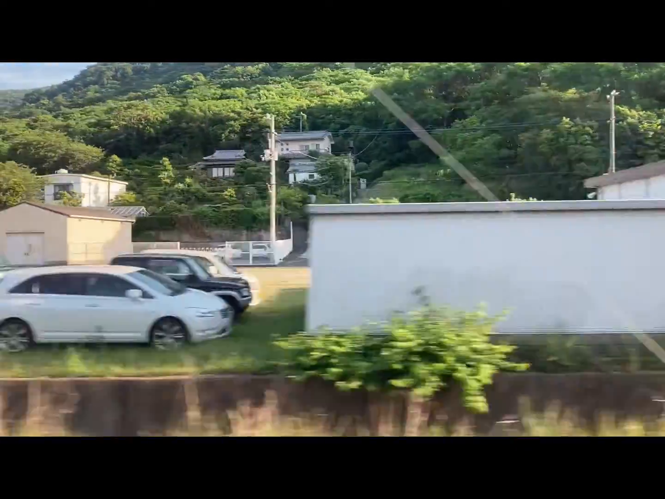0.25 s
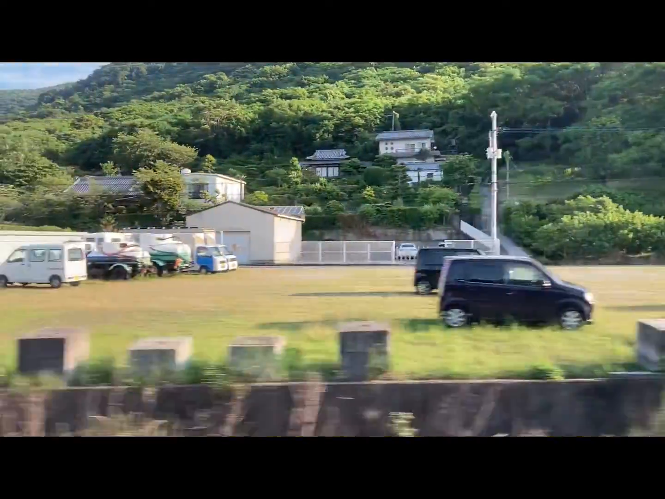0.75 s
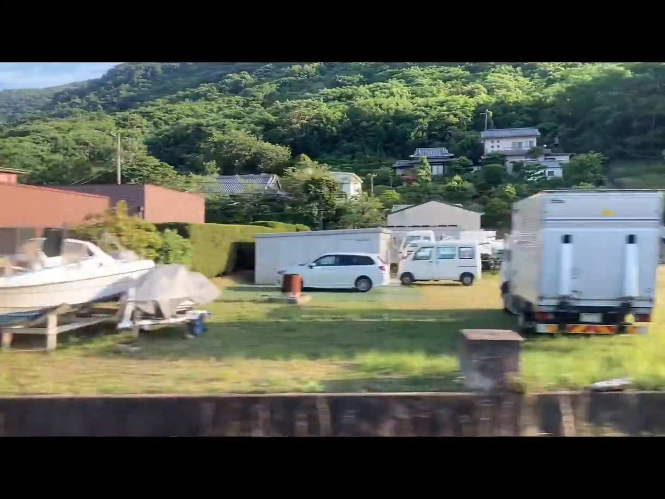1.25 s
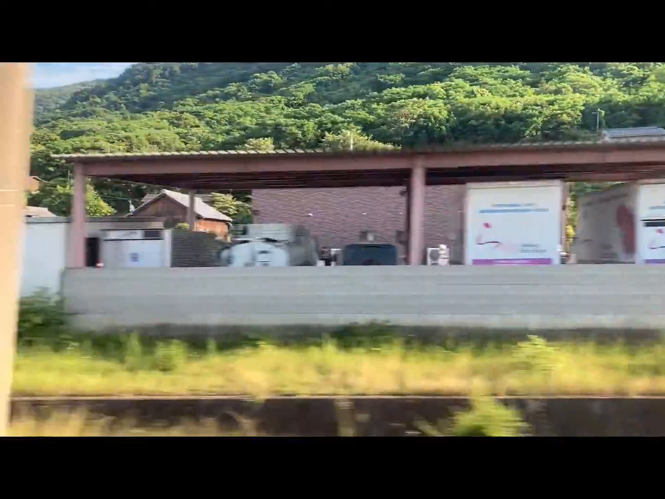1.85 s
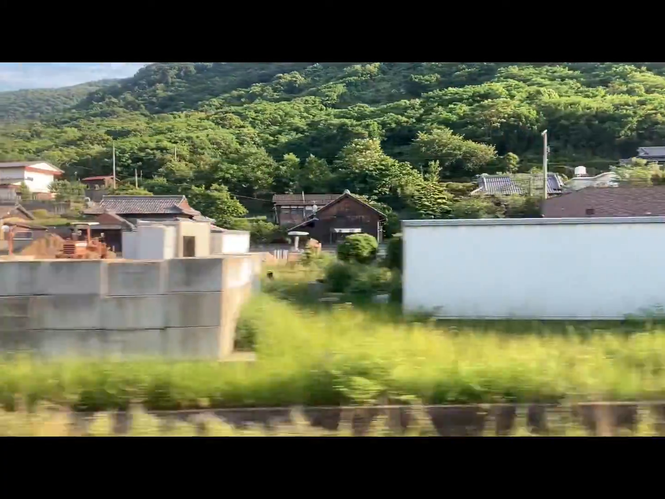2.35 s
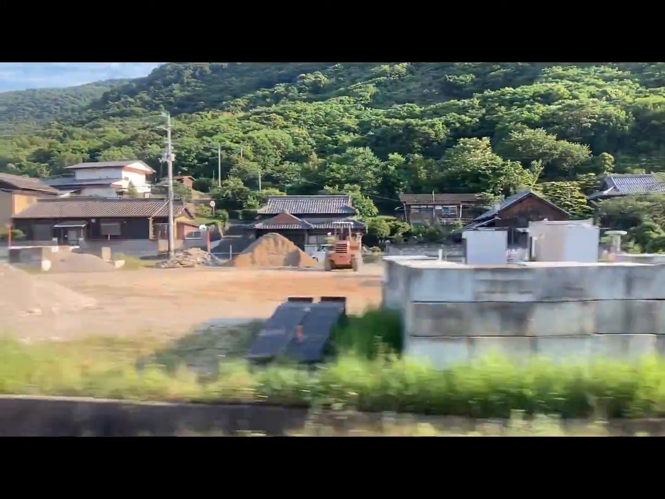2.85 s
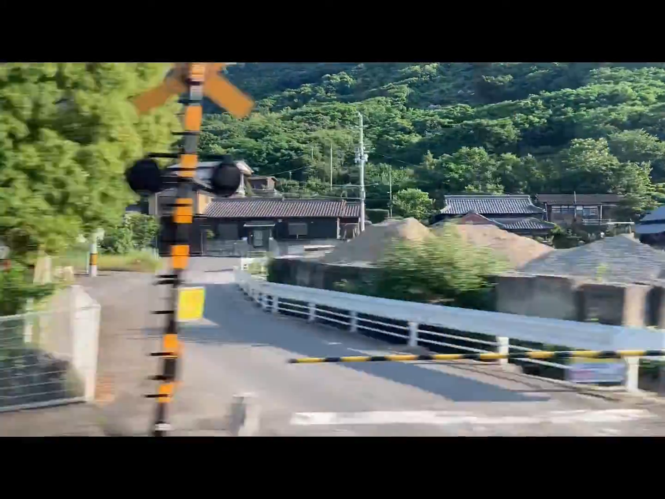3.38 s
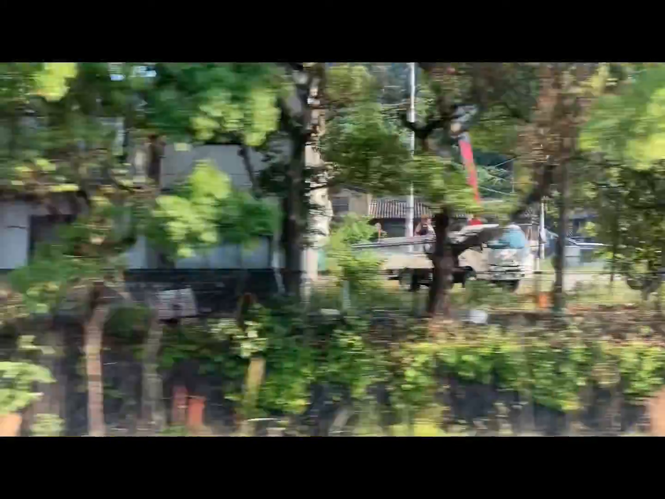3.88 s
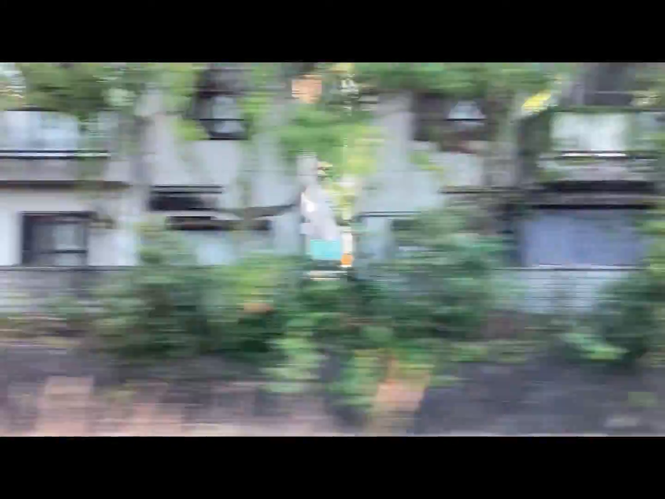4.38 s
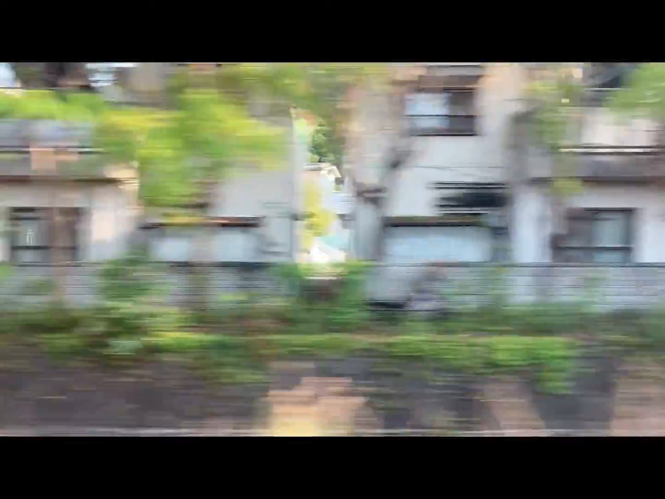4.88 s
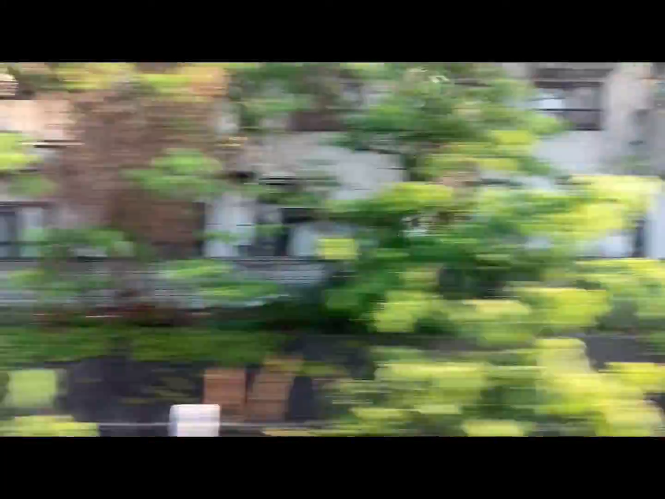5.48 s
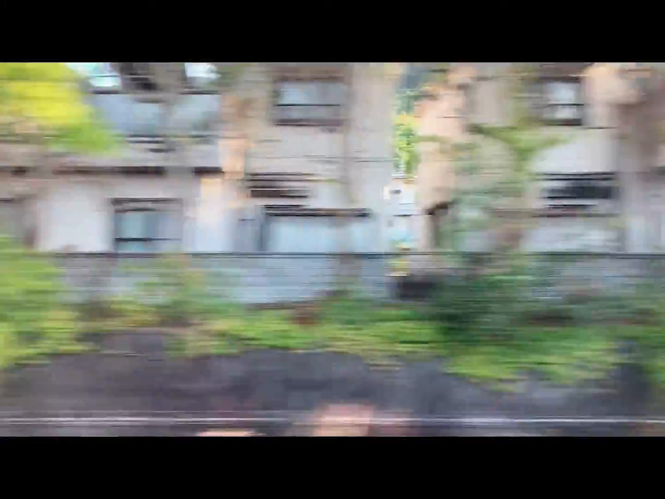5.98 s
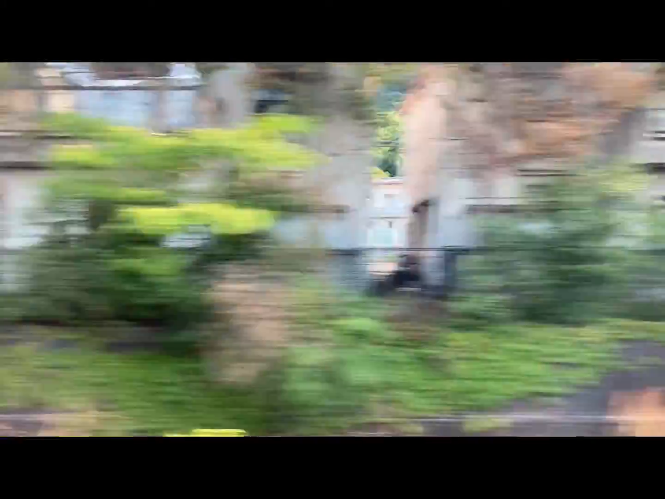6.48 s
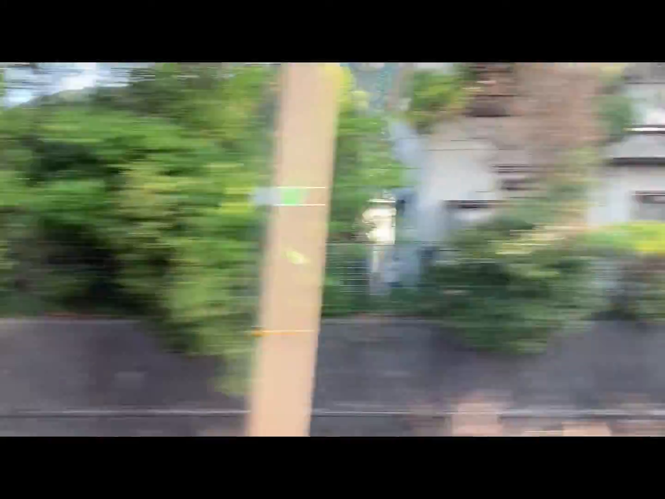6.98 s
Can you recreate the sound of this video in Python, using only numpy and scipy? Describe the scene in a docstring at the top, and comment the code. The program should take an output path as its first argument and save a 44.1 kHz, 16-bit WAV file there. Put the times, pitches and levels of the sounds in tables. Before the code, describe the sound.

Heard from a window seat inside a fast train: continuous deep rumble, drumming floor and muted wheel roar. Small squeaks come early, then a cluster of hard floor knocks and a tiny close tick. Near the middle, a level crossing brings gritty wheel grinding and a short reflected rush, followed by trim rattle and thuds. Afterwards the low drive hum stands out more, sinking slightly in pitch.

```python
"""Inside a railway carriage running at speed, two microphones at the window seat.
The bogies rumble, the floor drums and the wheels roar on the rails: shaped noise, partly through resonances.
The drive, two orders of one shaft, hums louder from half way and sinks a little in pitch.
At a level crossing the wheels grind and the roadway throws their noise back, both as bursts of noise.
Gliding tones make the car body's booms and the squeaks; decaying modes make floor knocks and a close tick."""
import sys
import numpy as np
from scipy import signal
from scipy.fft import rfft, irfft
from scipy.io import wavfile
from scipy.ndimage import uniform_filter1d

SR = 44100
rng = np.random.default_rng(int(sys.argv[2]) if len(sys.argv) > 2 else 0)


def int16_out(signal):
    """Quantize to a 16-bit WAV file."""
    q = np.round(np.clip(np.atleast_2d(signal).T, -1, 1) * 32767)
    wavfile.write(sys.argv[1], SR, q.astype(np.int16))


N = 318843
TIME, HZ = np.arange(N) / SR, np.fft.rfftfreq(N, 1 / SR)

# resonances of the wheels: centre_hz, width_hz, lift_db
WHEEL_RESONANCES = [(1342, 14, 4), (1410, 110, 8), (1525, 16, 4), (1787, 22, 6), (2010, 40, 5),
                    (2088, 14, 5), (2720, 150, 3), (3290, 160, 5.5), (4420, 70, 5.5)]
# brief random swells and dips of the rumble and drumming: middle_s, rumble_lift_db, drumming_lift_db
BRIEF_LIFTS = [(.36, 1.5, 0.5), (.64, -1.5, 0.5), (.92, 3, 1), (1.42, 1, 1), (1.52, 5.5, 0.5),
               (2.12, 2.5, 3), (2.88, 0.5, 1), (3.3, -5.5, 4), (3.71, 7.5, 5), (4.19, 6, 2),
               (4.44, -1, 2.5)]
LIFT_HALF_S = 0.032


def amp(db):
    """Decibels to gain."""
    return 10 ** (np.asarray(db) / 20)


def evened(x):
    """Scales to rms 1."""
    return x / np.sqrt(np.mean(x ** 2) + 1e-20)


def curve(rows):
    """Draws a table of times and values as straight lines, at every sample."""
    return np.interp(TIME, *np.transpose(rows))


def over_frequency(points):
    """Reads a frequency table at every bin, on a log axis."""
    hz, value = np.transpose(points)
    return np.interp(np.log(HZ + 1), np.log(hz + 1), value)


def wander(rate_hz):
    """Random drift of rms 1, with little movement faster than the rate."""
    noise = rfft(rng.standard_normal(N))
    return evened(irfft(noise / (1 + (HZ / rate_hz) ** 4), N))


def swell(middle_s, half_s):
    """A bell-shaped rise and fall."""
    return np.exp(-np.minimum(((TIME - middle_s) / half_s) ** 2 / 2, 40))


def swells(rows):
    """Gain of several swells together; rows hold middle_s, half_s, level_db."""
    return sum(amp(db) * swell(middle_s, half_s) for middle_s, half_s, db in rows)


def microphones(x, diffuse=None):
    """Sound reaches the left microphone later; a diffuse field also differs between the two."""
    # how alike the two microphones hear a diffuse field: frequency_hz, likeness (0-1)
    likeness = [(40, .96), (200, .98), (330, .92), (410, .8), (480, .6), (900, .64), (1150, .45),
                (1430, .75), (1800, .25), (3200, .4), (5000, .25)]
    # lag of the left microphone: frequency_hz, lag_rad
    left_lag = [(30, .15), (70, .25), (120, .4), (330, .55), (510, 1), (620, 1.7), (820, 1.95),
                (1000, 1.65), (1350, 3), (1800, 2.8), (2200, 6), (4000, 10.6), (6000, 16.5), (9000, 24.5)]
    # level of left over right: frequency_hz, difference_db
    left_tilt = [(30, 1.4), (100, 0), (300, -.7), (550, -2.4), (1000, 0), (1450, 2.7), (2600, 2.6),
                 (4500, .8), (6000, 1), (8000, 3)]
    soft_ends = signal.windows.tukey(N, .002)
    right = left = rfft(x * soft_ends)
    if diffuse is not None:
        same = np.clip(over_frequency(likeness), 0, 1)
        left = same * right + np.sqrt(1 - same ** 2) * rfft(diffuse * soft_ends)
    tilt = amp(over_frequency(left_tilt) / 2)  # half the difference on each side
    left = left * np.exp(-1j * over_frequency(left_lag))
    return irfft(np.array([left * tilt, right / tilt]), N)


def field(spectrum, resonances=()):
    """Random vibration radiated into the cabin through a structure's resonances; their mean has rms 1."""
    db = over_frequency(spectrum)
    for centre_hz, width_hz, lift_db in resonances:
        db = db + lift_db / (1 + (2 * (HZ - centre_hz) / width_hz) ** 2)
    # the cabin lining swallows what lies above the table
    lining = np.maximum(HZ / spectrum[-1][0], 1) ** -10
    noise = rfft(rng.standard_normal((2, N)))
    pair = microphones(*irfft(noise * amp(db) * lining, N))
    return pair / pair.mean(0).std()


def ringing(rows, stray_share, stray_rate_hz, flutter_db):
    """Resonances build up and die away, their pitch gliding and straying, their level fluttering."""
    stray = 1 + stray_share * wander(stray_rate_hz)
    out = np.zeros(N)
    for middle_s, hz, half_s, db, glide_hz_per_s in rows:
        near = abs(TIME - middle_s) < 4 * half_s
        pitch = (hz + glide_hz_per_s * (TIME[near] - middle_s)) * stray[near]
        tone = np.sin(2 * np.pi * np.cumsum(pitch) / SR)
        out[near] += amp(db) * swell(middle_s, half_s)[near] * tone
    flutter = evened(amp(flutter_db * wander(stray_rate_hz)))
    return microphones(np.sqrt(2) * out * flutter)


def hiss():
    """High noise, coloured by the wheel resonances and wavering slightly."""
    # its spectrum before levelling: frequency_hz, relative_level_db_per_hz
    hiss_spectrum = [(1200, -15.5), (2600, 4), (3800, -1), (4600, 0), (5400, -2.5), (6300, -10.5),
                     (8000, -18.5), (9500, -28.5)]
    return field(hiss_spectrum, WHEEL_RESONANCES) * amp(-55 + .5 * wander(25))


def bogie_rumble():
    """Low random vibration of the bogies fills the cabin, swelling and dipping."""
    # its spectrum before levelling: frequency_hz, relative_level_db_per_hz
    rumble_spectrum = [(10, -41), (24, -20), (35, -8), (50, 2), (70, 4.5), (100, 2), (123, -3.5),
                       (145, -0.5), (200, -17.5), (320, -37)]
    lift_db = sum(db * swell(s, LIFT_HALF_S) for s, db, _ in BRIEF_LIFTS)
    return field(rumble_spectrum) * amp(-20.5 + lift_db)


def floor_drumming():
    """Random vibration drums in the floor panels at their resonances, swelling, dipping and surging."""
    # spectrum before levelling: frequency_hz, relative_level_db_per_hz
    panel_spectrum = [(90, -34), (140, -5), (185, 1), (215, -0.5), (275, -10.5), (330, -11), (400, -14),
                      (480, -17.5), (650, -22), (1200, -28)]
    # resonances of the panels: centre_hz, width_hz, lift_db
    panel_resonances = [(186, 14, 2), (251, 14, 7.5), (329, 14, 8.5), (402, 25, 5), (528, 14, 7),
                        (556, 12, 7), (632, 24, 6)]
    # slow rise and fall of the drumming: time_s, lift_db
    slow_lift = [(0, -4), (2.4, -2.5), (2.75, 1.5), (3.55, 1), (4.4, 2.5), (5.2, 1.9), (5.6, 2.5),
                 (6.1, -0.2), (6.65, 5), (7.23, 2)]
    middling_db, surge_db, surge_rate_hz = -24.5, 1.0, 17
    brief_lift_db = sum(db * swell(s, LIFT_HALF_S) for s, _, db in BRIEF_LIFTS)
    surges_db = surge_db * wander(surge_rate_hz)
    level_db = middling_db + curve(slow_lift) + brief_lift_db + surges_db
    return field(panel_spectrum, panel_resonances) * amp(level_db)


def drive():
    """Orders of one shaft turn at multiples of its speed, each wavering in level and phase."""
    # orders of the shaft, lower then upper: multiple, share_of_swells (0-1)
    shaft_orders = [(4, 1), (5, 0)]
    # speed of the shaft: time_s, turns_per_s
    shaft_speed = [(0, 37.8), (4.5, 37.5), (7.23, 36.2)]
    # level of the hum before swells and waver: time_s, lower_order_db, upper_order_db
    hum_levels = [(0, -32, -36), (2.5, -28.5, -34), (3.5, -28, -31), (3.9, -24.5, -25.5), (4.8, -23, -24),
                  (5.3, -25, -23.5), (5.9, -26, -23), (6.3, -24, -23), (6.85, -27, -24), (7.23, -23, -27)]
    # swells of the hum when the body rings along: middle_s, half_s, lift_db
    hum_swells = [(2.843, 0.033, 12.5), (3.893, 0.041, 8), (4.443, 0.12, 8.5), (6.174, 0.084, 7.5)]
    turns = np.cumsum(curve(shaft_speed)) / SR
    times, *levels = np.transpose(hum_levels)
    swell_db = sum(db * swell(s, half_s) for s, half_s, db in hum_swells)
    out = np.zeros(N)
    for (multiple, share), db in zip(shaft_orders, levels):
        waver_db = 1.5 * wander(2.6)
        level = amp(np.interp(TIME, times, db) + share * swell_db + waver_db)
        phase_waver = .45 * wander(4)  # radians
        out += level * np.sin(2 * np.pi * multiple * turns + phase_waver)
    return microphones(np.sqrt(2) * out)


def wheels_on_rails():
    """Rough rail sets the wheels ringing in a roar that wavers slightly."""
    # spectrum before levelling: frequency_hz, relative_level_db_per_hz
    rail_spectrum = [(200, -13), (400, -5.5), (620, -4.5), (900, 1), (1250, -4.5), (1550, -8.5),
                     (1700, -13.5), (2080, -14), (2300, -23.5), (3000, -29.5), (4500, -36.5)]
    # level of the rolling noise: time_s, level_db
    rolling = [(0, -37), (1.5, -36.5), (2.3, -34.5), (4.7, -34.5), (6.1, -36.5), (7.23, -35.5)]
    rough_rail = amp(.6 * wander(18))
    return field(rail_spectrum, WHEEL_RESONANCES) * amp(curve(rolling)) * rough_rail


def thrown_back():
    """Walls and roadway throw the wheel noise back as they pass."""
    # spectrum before levelling: frequency_hz, relative_level_db_per_hz
    roadway_spectrum = [(200, -16), (500, -5), (1000, -4), (1400, 1), (1700, -2.5), (2050, -2), (2500, -13),
                        (3600, -18), (5000, -20.5), (7000, -37), (9500, -49)]
    # passing walls and roadway: middle_s, half_s, level_db
    reflectors = [(2.394, 0.53, -53), (3.078, 0.092, -40.5), (3.442, 0.11, -34), (3.598, 0.12, -47.5)]
    return field(roadway_spectrum, WHEEL_RESONANCES) * swells(reflectors) * amp(.4 * wander(30))


def wheel_grind():
    """Wheels grind over patches of rough rail, hardest at the crossing."""
    # spectrum before levelling: frequency_hz, relative_level_db_per_hz
    grind_spectrum = [(700, -16), (1100, -3), (1350, -1), (1500, -2.5), (1700, -6), (2050, -11),
                      (2500, -28)]
    # patches of rough rail: middle_s, half_s, level_db
    rough_patches = [(2.55, .025, -39), (3.0, .025, -37), (3.36, .025, -38), (3.425, .022, -30),
                     (3.487, .022, -36), (6.28, .02, -39)]
    grating = evened(amp(1.8 * wander(90)))
    return field(grind_spectrum, WHEEL_RESONANCES) * swells(rough_patches) * grating


def body_booms():
    """The car body booms in brief low resonances of straying pitch."""
    # booms: middle_s, pitch_hz, half_s, level_db, glide_hz_per_s
    booms = [(.03, 108.2, 0.046, -15, 7), (2.2, 99.5, .035, -12, -1), (2.91, 98.9, 0.072, -15, -2),
             (4.4, 100.9, 0.029, -21.5, 1.5), (5.2, 97.2, .045, -19, -0.5), (5.805, 189.3, .028, -12, -350),
             (6.53, 105.2, 0.073, -15.5, -4)]
    return ringing(booms, stray_share=.02, stray_rate_hz=10, flutter_db=0)


def squeaking_fittings():
    """Fittings squeak in short, mostly high tones with a fast flutter."""
    # squeaks: middle_s, pitch_hz, half_s, level_db, glide_hz_per_s
    squeaks = [(.236, 6490, .016, -53, 0), (.295, 6480, .045, -61, -200), (.225, 3300, .025, -45, 0),
               (.335, 3215, .05, -45.5, 0), (.425, 4118, .028, -54, 0), (.49, 1513, .015, -33, 0),
               (.52, 1505, .007, -29, -1500), (1.88, 8080, .05, -67, -4000), (1.86, 2800, .03, -54, 0),
               (1.9, 5300, .06, -63, -1500), (4.229, 1050, .006, -30, 3000), (4.246, 1090, .008, -21, 4500),
               (4.277, 1125, .012, -33, 3000)]
    return ringing(squeaks, stray_share=.003, stray_rate_hz=120, flutter_db=3)


def window_trim():
    """The window trim chatters at its resonances in uneven bursts."""
    # spectrum before levelling: frequency_hz, relative_level_db_per_hz
    rattle_spectrum = [(1200, -20), (3200, 2), (3800, 0), (4500, 2), (6500, -3), (8300, -13), (9400, -24),
                       (10000, -35), (12000, -33)]
    # resonances of the trim: centre_hz, width_hz, lift_db
    trim_resonances = [(2990, 87, 7), (3280, 67, 11), (4410, 50, 12.5), (4890, 25, 7), (5280, 80, 7),
                       (5820, 30, 7), (6720, 45, 8), (7610, 100, 3)]
    # rattles: middle_s, half_s, level_db
    rattles = [(1.33, 0.017, -59), (1.42, 0.045, -57), (1.87, .05, -58), (2.33, 0.03, -57.5),
               (2.49, 0.039, -56), (3.63, 0.03, -56), (3.69, .02, -54), (3.72, .006, -48.5),
               (3.74, .011, -48.5), (3.768, .022, -53), (3.85, 0.14, -59), (4.2, 0.06, -58),
               (4.41, .04, -59), (4.8, 0.03, -58.5), (5.93, .025, -62), (6.21, .03, -61),
               (7.15, 0.018, -55.5)]
    chatter_db, chatter_rate_hz = 1.4, 130
    chatter = evened(amp(chatter_db * wander(chatter_rate_hz)))
    return field(rattle_spectrum, trim_resonances) * swells(rattles) * chatter


def floor_knocks():
    """Knocks thud in the floor: modes blur, high ones die first, each blow has its own pitch range."""
    # blows from under the floor: start_s, level_db, ring_time_s, lowest_pitch_hz, highest_pitch_hz
    blows = [(.553, -23, .12, 150, 270), (.636, -13.5, .08, 100, 230), (.695, -18.5, .12, 100, 260),
             (.818, -19, .08, 400, 1000), (.8235, -9.5, .08, 200, 1000), (.839, -18.5, .22, 170, 1900),
             (.864, -27.5, .2, 600, 1700), (.903, -22, .15, 150, 330), (.923, -28, .15, 600, 1500),
             (1.372, -24, .13, 200, 650), (1.398, -13.5, .17, 100, 200), (2.85, -18, .18, 100, 260),
             (2.919, -17.5, .2, 180, 500), (2.962, -21.5, .12, 100, 300), (3.25, -22, .12, 150, 450),
             (3.293, -20, .2, 180, 800), (3.684, -21, .16, 450, 1300), (3.704, -21, .22, 350, 1400),
             (3.79, -15.5, .11, 100, 240), (4.181, -22.5, .18, 300, 800), (4.376, -15, .17, 100, 170),
             (4.412, -19.5, .18, 200, 500), (5.72, -25, .18, 480, 750), (5.81, -25, .14, 420, 700),
             (6.24, -16, .14, 100, 180), (6.475, -21, .3, 380, 620), (6.565, -21, .12, 350, 600)]
    # what a blow rings with: pitch_hz, relative_level_db
    floor_modes = [(160, -7), (205, -6), (270, -4), (335, -4), (372, -2), (425, -6), (500, -6), (560, -8),
                   (640, -6), (716, -10), (818, -4), (905, -9), (1070, -11), (1220, -10), (1394, -14)]
    rise_s, blur_share = .0028, .07  # blur: straying of the modes as a share of their pitch
    ring_reference_hz = 400  # a mode here has the listed ring time, higher ones less
    t = np.arange(SR // 2) / SR
    rise = 1 - np.exp(-t / rise_s)
    hz, db = np.transpose(floor_modes)[:, :, None]
    out = np.zeros(N)
    for start_s, level_db, ring_s, bottom_hz, top_hz in blows:
        noise = rng.standard_normal((len(hz), len(t)))
        stray = evened(uniform_filter1d(noise, size=400, axis=1))
        turns = rng.random(hz.shape) + np.cumsum(hz * (1 + blur_share * stray), axis=1) / SR
        # modes outside the blow's range fade out
        weight = amp(db) / (1 + (hz / top_hz) ** 4) / (1 + (bottom_hz / hz) ** 4)
        # 60 dB down after the ring time
        decay = np.exp(-np.log(1000) * t / ring_s * np.sqrt(hz / ring_reference_hz))
        thud = (weight * decay * np.sin(2 * np.pi * turns)).sum(0) / np.linalg.norm(weight)
        knock = np.sqrt(2) * amp(level_db) * thud * rise
        part = out[round(start_s * SR):][:len(t)]
        part += knock[:len(part)]
    return microphones(out)


def close_tick():
    """A light tap right at the right microphone: a sharp snap that dies within milliseconds."""
    # what it rings with, before the contact softens it: pitch_hz, level_db, ring_time_s
    tick_modes = [(400, -17, .018), (800, -11.5, .011), (1600, -10.5, .004), (2600, -16, .003)]
    start_s, contact_s, left_db = .6366, .00036, -20
    t = np.maximum(TIME - start_s, 0)
    snap = np.zeros(N)
    for hz, db, ring_s in tick_modes:
        decay = np.exp(-np.log(1000) * t / ring_s)
        snap += amp(db) * decay * np.sin(2 * np.pi * hz * t)
    contact = np.hanning(round(contact_s * SR))
    softened = np.convolve(snap, contact / contact.sum(), "same")
    return softened * amp([[left_db], [0]])


def scene():
    """Everything heard at the window seat."""
    running = hiss() + bogie_rumble() + floor_drumming() + drive() + wheels_on_rails()
    crossing = thrown_back() + wheel_grind()
    carriage = body_booms() + squeaking_fittings() + window_trim()
    return running + crossing + carriage + floor_knocks() + close_tick()


def record(dry):
    """The recorder's band limit, a low-pass filter."""
    edge_hz = 12400
    low_pass = signal.firwin(511, edge_hz, window=("kaiser", 9), fs=SR)
    return signal.oaconvolve(dry, low_pass[None], "same")


dry = scene()
out = record(dry)
int16_out(out)
```